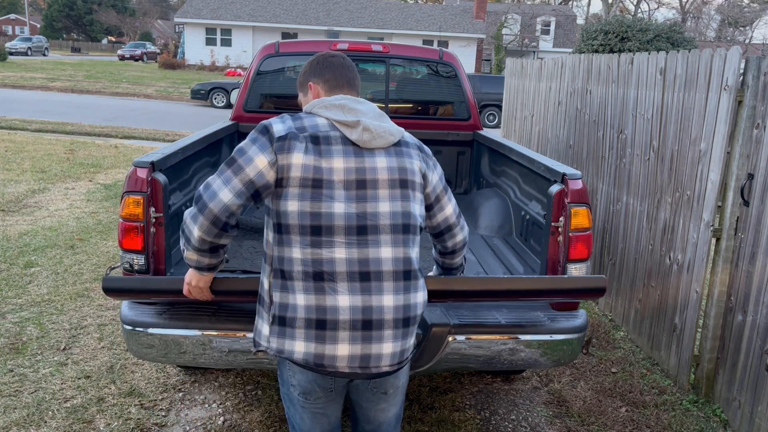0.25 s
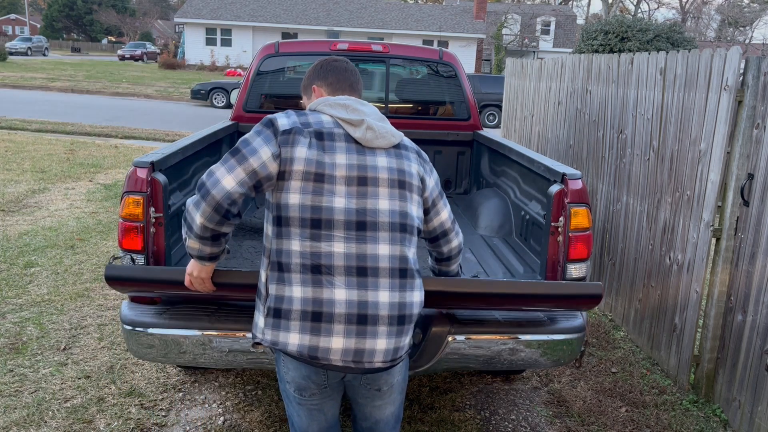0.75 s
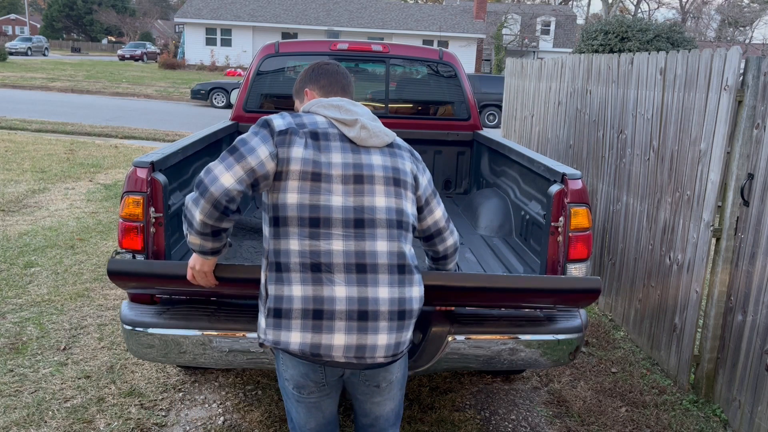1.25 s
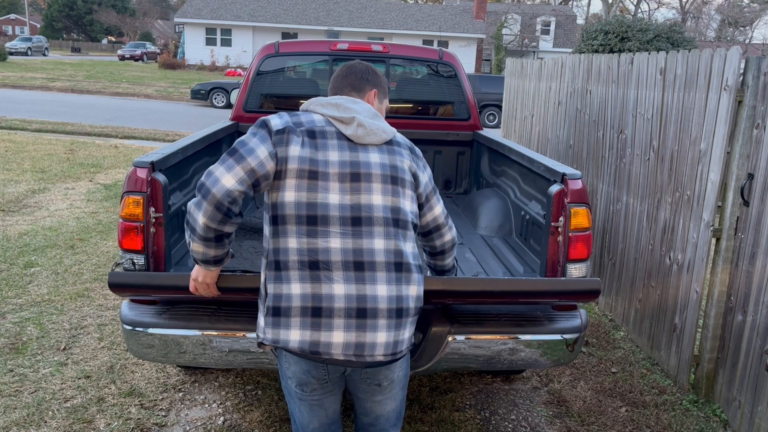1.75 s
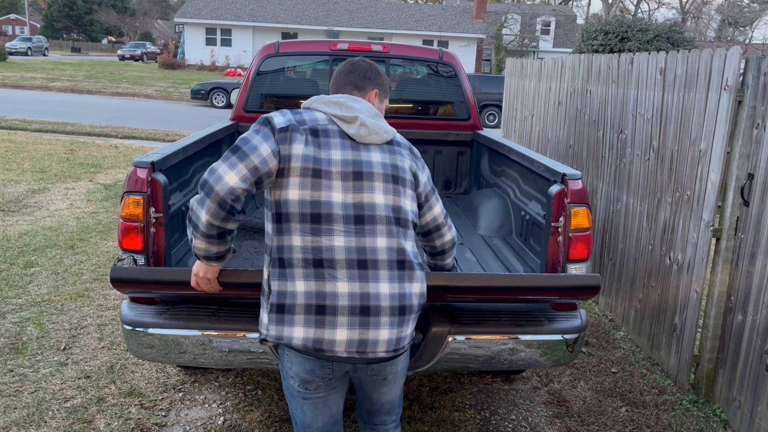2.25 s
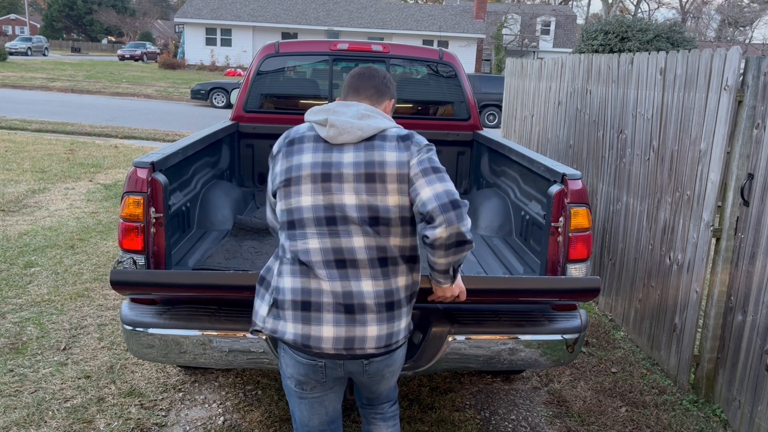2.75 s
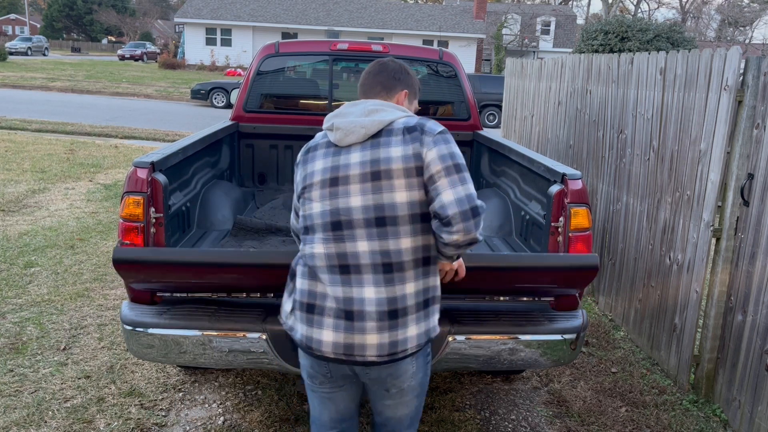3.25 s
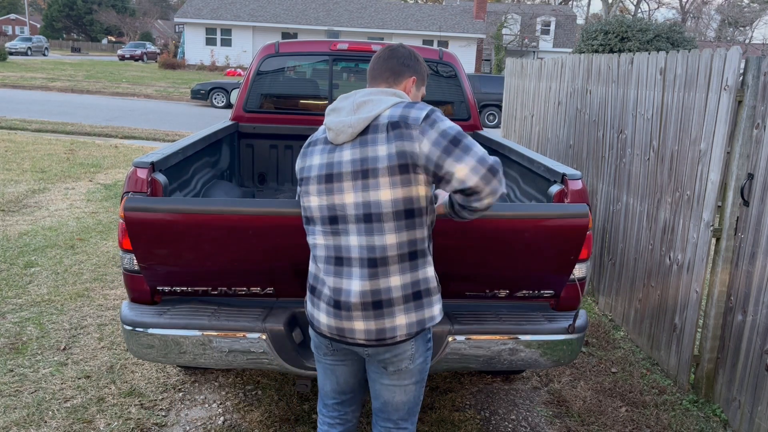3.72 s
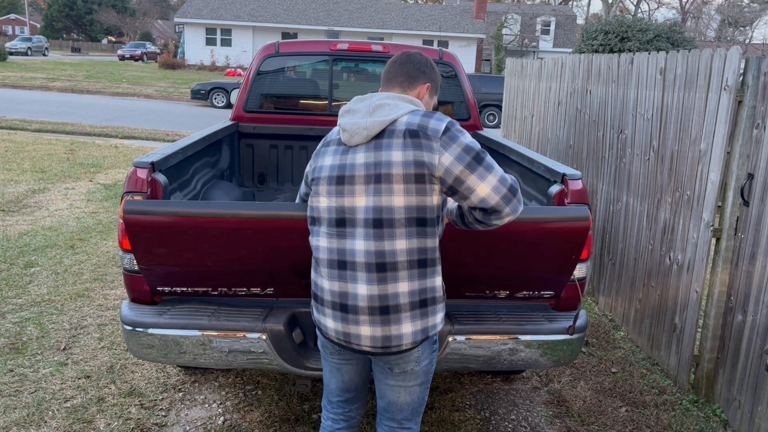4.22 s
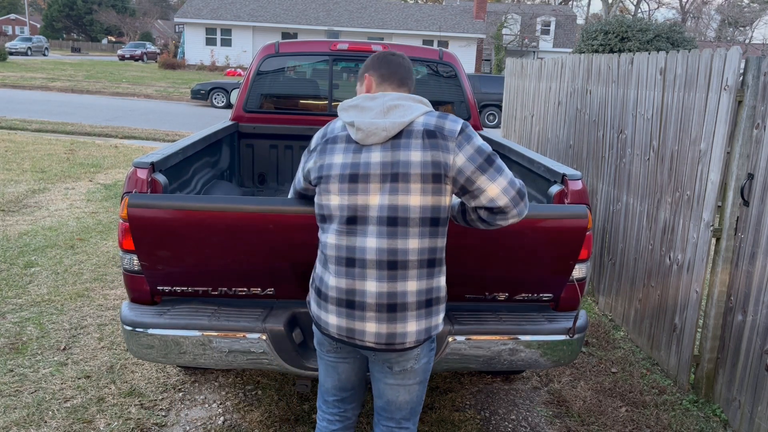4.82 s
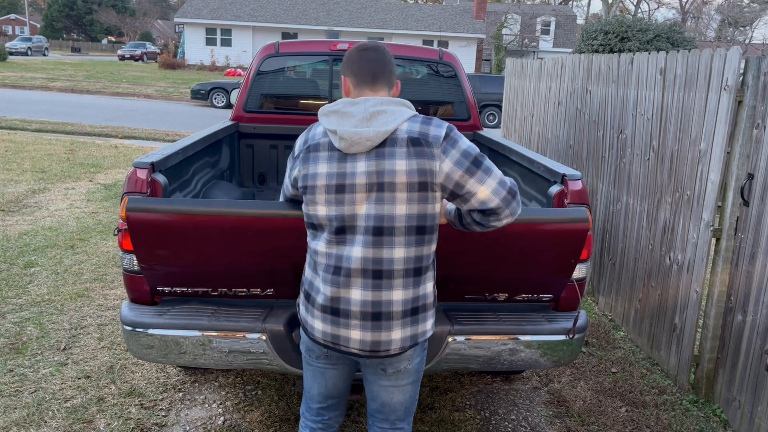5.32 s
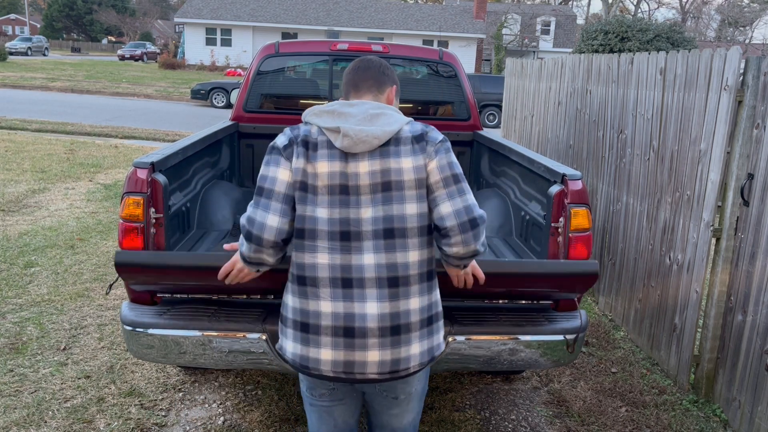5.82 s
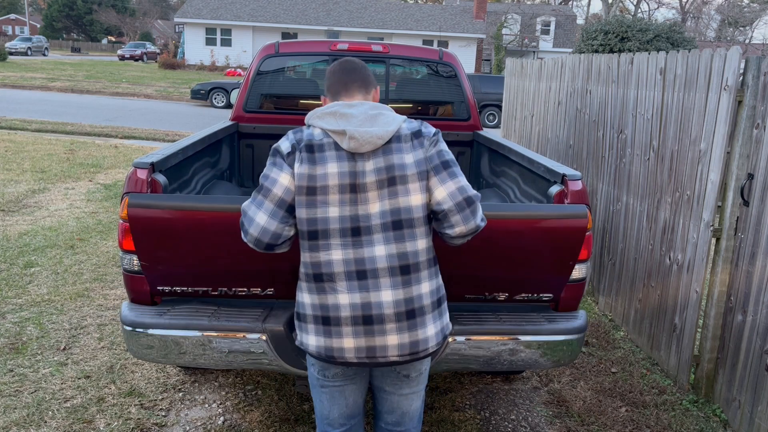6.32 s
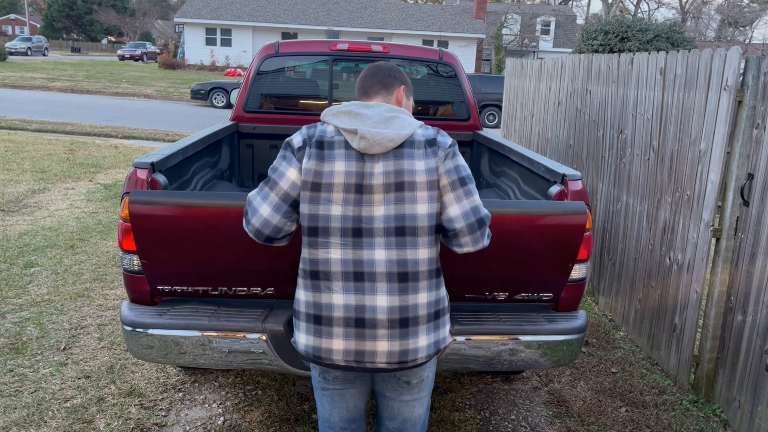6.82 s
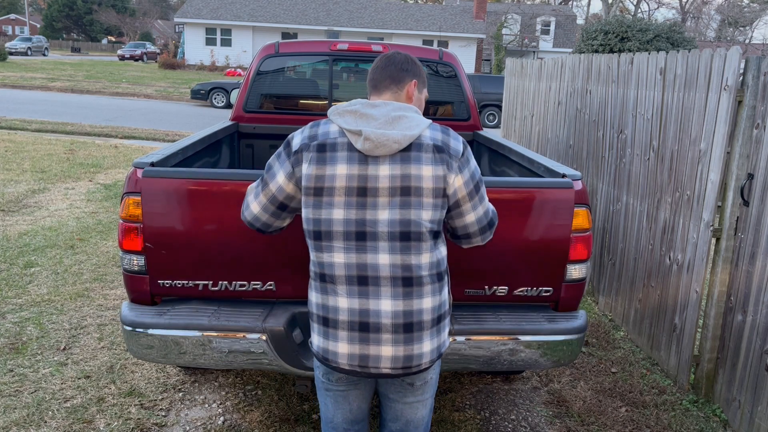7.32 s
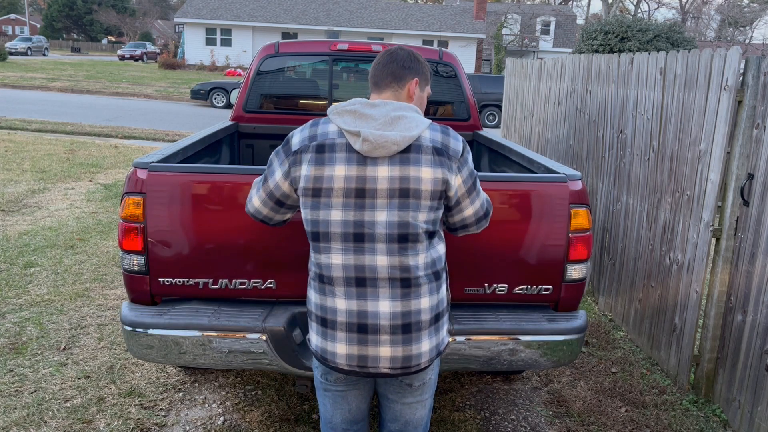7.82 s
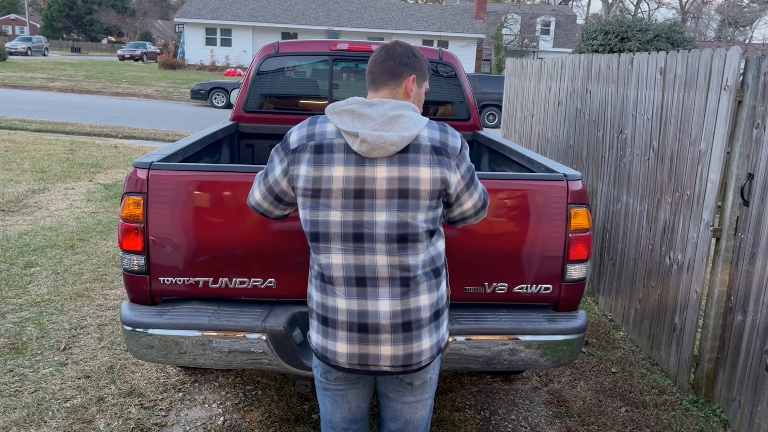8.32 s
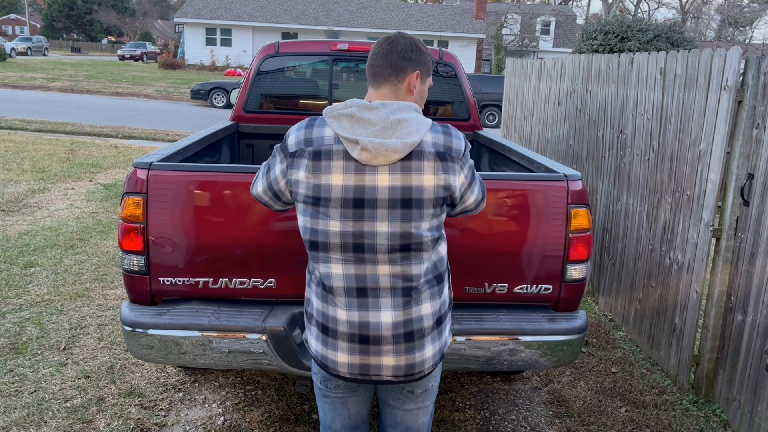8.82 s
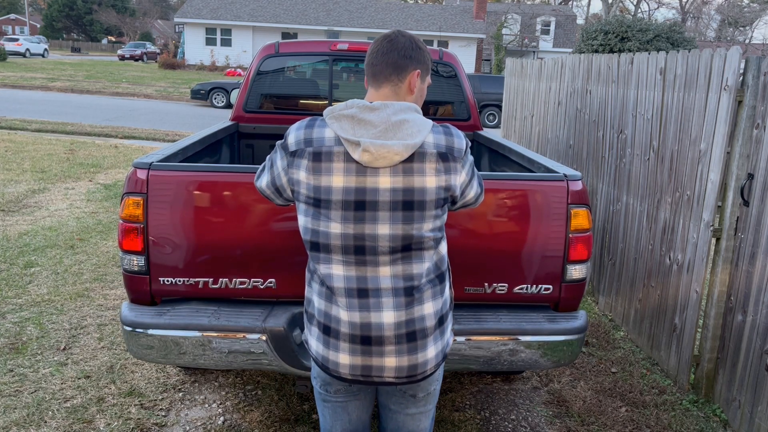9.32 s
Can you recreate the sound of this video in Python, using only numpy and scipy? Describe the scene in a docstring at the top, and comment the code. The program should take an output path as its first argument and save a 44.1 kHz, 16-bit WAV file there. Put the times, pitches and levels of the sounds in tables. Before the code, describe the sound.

Dull thuds and sharp steel clinks near a truck bed, a passing car, then hinge squeaks, a scrape, one heavy clanging slam and several small rattles.

```python
"""In a yard, a pickup's tailgate is worked onto its hinge pins: dull knocks, steel clinks, a rustling jacket.
It swings up on squeaking hinges, grinds against the latch, slams shut and rattles as it is tugged.
Contacts are short noise bursts shaped by colour and fading; steel adds ringing sine waves.
Squeaks are gliding tones with overtones. Filtered noise makes cloth, rubbing and distant traffic.
A car passes on the street at the start, with a humming exhaust note; a fainter one passes later.
"""
import sys
import numpy as np
from scipy import signal
from scipy.fft import rfft, irfft, next_fast_len
from scipy.io import wavfile
from scipy.ndimage import map_coordinates

SR = 44100
rng = np.random.default_rng(int(sys.argv[2]) if len(sys.argv) > 2 else 0)


def put_to_file(sound):
    """Save the sound as 16-bit audio at rate SR, in the file named by the first command-line argument."""
    columns = np.atleast_2d(sound).T  # one column per channel
    safe = np.clip(columns, -1, 1)
    whole_steps = np.round(safe * 32767)
    wavfile.write(sys.argv[1], SR, whole_steps.astype(np.int16))


N = 421596  # length of the scene in samples
TOP_HZ = 15870  # nothing is kept above this pitch

# Street and air. Colours are lists of (frequency [Hz], level [dB]).
# distant traffic
AIR_COLOUR = [(20, -7), (40, 3), (65, 3.5), (130, -7.5), (200, -6), (310, -7.5), (500, -12.5),
              (1000, -17.5), (1600, -29), (2500, -34.5), (4000, -39.5), (8000, -46), (16000, -47.5)]
# rolling tyres
TYRE_COLOUR = [(180, -19), (300, 4), (416, 0), (778, 3), (2540, -22), (4740, -47), (5790, -47), (9000, -55),
               (11700, -86), (19800, -120)]
# exhaust rumble
EXHAUST_COLOUR = [(40, -50.5), (85, -4), (115, 2), (150, -2), (195, -1), (250, -13), (400, -26), (900, -98)]
# passing cars, levels before the fence dulls the near one:
# (nearest at [s], time to cover their own distance from the yard [s], tyre level [dB], exhaust level [dB])
CARS = [(.76, .33, -49, -41), (3.3, 1.3, -63, -53)]
# tones in the near car's exhaust note: (multiple of the note [ratio], level [dB])
NOTE_TONES = [(1, 0), (1.6, -5)]
# the tailpipe points back, and is heard over a longer stretch than the tyres
EXHAUST_LAG_S, EXHAUST_SPREAD = .15, 1.8
# the near car goes behind the fence
SCREEN_S, SCREEN_FADE_S, SCREEN_DB = 1.4, .12, -9
# exhaust note: pitch abreast, share that it falls on either side, level over the rumble
NOTE_HZ, NOTE_DROP, NOTE_DB = 120, .14, -2

# how fast the yard's echo dies: (frequency [Hz], time to fall 60 dB [s])
YARD_FADE = [(100, 0.82), (600, 0.35), (3000, 0.27), (9000, 0.18)]

# rustling cloth: (frequency [Hz], level [dB])
CLOTH_COLOUR = [(300, -43), (1200, 21), (2000, 9.5), (3000, 3.5), (4500, 2.5), (7000, -3), (10000, -12),
                (16000, -28)]
# arm movements that rustle the jacket, over its resting level: (time [s], length [s], level [dB])
REACHES = [(0, .65, -66), (2.4, .45, -66), (3.25, .3, -64), (3.85, 1.5, -68), (5.38, .065, -55),
           (5.55, .15, -55.5), (6.6, .5, -69), (8.36, 1.05, -68)]
REACH_RISE_S, REACH_FALL_S, CLOTH_REST_DB = .05, .04, -78

# dry rubbing in the hinge cups: (frequency [Hz], level [dB])
RUB_COLOUR = [(200, -11), (500, 1), (1000, 1.5), (1600, 1), (2200, -11), (3000, -16.5), (6000, -31),
              (16000, -46)]
# the open gate rubs as it is lifted and lowered: (time [s], length [s], relative level [dB])
SWINGS = [(3.03, .14, -59), (3.19, .11, -50.5), (3.37, .13, -55), (3.87, .1, -60), (4.42, .13, -60),
          (4.62, .11, -54), (5.1, .09, -52.5), (5.53, .04, -44.5), (5.61, .035, -42), (5.8, .2, -55),
          (5.98, .3, -50.5), (6.9, .38, -61)]
SWING_RISE_S, SWING_FALL_S = .03, .014

# the gate bumps on its hinges and in its latches:
# (time [s], length [s], thud pitch [Hz], thud level [dB], clank level [dB], click level [dB])
KNOCKS = [(.043, .014, 215, -36, -42.5, -69), (1.481, .026, 185, -17.5, -49, -51),
          (1.532, .0078, 115, -30.5, -70, -58), (1.626, .012, 132, -26, -64, -68),
          (1.658, .0093, 252, -54, -39.5, -43), (1.847, .015, 146, -36, -58, -70),
          (2.184, .025, 122, -20.5, -55, -57.5), (2.228, .016, 148, -13, -30, -30.5),
          (2.849, .039, 150, -42.5, -73, -71), (3.003, .019, 262, -44.5, -50, -69),
          (3.594, .0043, 230, -50, -37.5, -55), (3.827, .01, 163, -38.5, -70, -59),
          (4.49, .036, 181, -38.5, -48, -55.5), (4.744, .028, 124, -16.5, -32, -52),
          (4.784, .011, 140, -27, -56, -79), (5.033, .025, 106, -25.5, -52, -68),
          (5.192, .029, 235, -24, -21.5, -35), (5.615, .03, 190, -44, -52, -62),
          (5.704, .019, 200, -31, -36, -38.5), (5.771, .024, 200, -45, -39.5, -44.5),
          (7.173, .039, 250, -57, -44.5, -52), (8.113, .007, 250, -32, -22, -29)]
# a thud's colour around its pitch: (multiple of the pitch [ratio], level [dB])
THUD_COLOUR = [(.15, -19.5), (.4, -5.5), (.8, 1), (1.25, -2), (2.1, -8), (3.6, -21.5), (7, -32.5),
               (18, -71)]
# clanking skin: (frequency [Hz], level [dB])
CLANK_COLOUR = [(100, -30.5), (300, -5), (430, 4.5), (600, 2.5), (830, 3), (1050, 0), (1350, -.5),
                (1900, -24.5), (4000, -25), (9000, -62)]
# clicking pin: (frequency [Hz], level [dB])
CLICK_COLOUR = [(600, -16.5), (1500, 5.5), (2400, 4), (3600, -7), (6000, -16.5), (10000, -30), (16000, -44)]
# how fast a blow dies in the hinge: (frequency [Hz], time to fall 60 dB [s])
HINGE_FADE = [(100, 0.11), (600, 0.057), (3000, 0.033), (12000, .02)]

# steel pins, cups and cable ends touch:
# (time [s], length [s], touch level [dB], contact pitch [Hz], ring level over the touch [dB])
CLINKS = [(.036, .0031, -57, 8900, -32), (.131, .02, -67.5, 2740, 6.5), (.599, .015, -59.5, 4530, -15),
          (1.382, .022, -42.5, 2450, -1), (1.659, .0067, -42.5, 3000, -25), (1.797, .028, -58.5, 2130, -3),
          (2.23, .015, -47, 5200, -21), (2.563, .036, -63, 4240, -5), (3.213, .052, -57, 2590, -25),
          (3.275, .033, -52.5, 3100, -10), (3.382, .0096, -56, 2780, -18), (3.455, .0061, -57, 3160, -7),
          (3.49, .0017, -42.5, 3900, -6), (3.724, .013, -50.5, 2130, -7), (3.957, .07, -68.5, 3940, -4),
          (4.097, .0016, -50, 2900, -10), (4.523, .023, -50, 3870, -7), (4.518, .016, -57.5, 15000, -25),
          (4.683, .033, -45.5, 3140, -15), (4.695, .046, -51, 11800, -9), (5.703, .02, -42.5, 6550, -23),
          (5.771, .0021, -43, 5100, -15), (5.91, .016, -53, 3360, -19), (6.025, .025, -60, 3150, 0),
          (6.696, .005, -60, 1800, -6), (8.113, .005, -33, 6500, -15), (8.35, .0037, -56, 4000, -11)]
# ring of the small hardware: (frequency [Hz], level [dB], time to fall 60 dB [s])
STEEL_RING = [(1870, -9, 0.067), (2010, -2, 0.038), (2310, 0, 0.065), (2660, -4, 0.021), (2860, -10, 0.042),
              (3413, -7, 0.036), (4700, -9, .05)]
# loose hardware ticks faintly while the gate is handled; the ring level is over the touch
TICK_FROM_S, TICK_TO_S, TICKS_PER_S = 3.3, 4.5, 4
TICK_S, TICK_DB, TICK_HZ, TICK_RING_DB = .008, -68, 3800, -4

# hinge squeaks:
# (time [s], length [s], first pitch [Hz], last pitch [Hz], level before sagging [dB], pitch jitter [share])
SQUEAKS = [(.596, .02, 3910, 4880, -57.5, .04), (3.95, .09, 1700, 1880, -64, .07),
           (4.43, .1, 1750, 1850, -62, .07), (5.908, .014, 3040, 3300, -51.5, .06),
           (7.076, .035, 4050, 5100, -59.5, .045), (7.16, .05, 3900, 3150, -64, .06),
           (7.212, .045, 3080, 2930, -60, .035), (7.264, .125, 2480, 2300, -54.5, .026),
           (7.272, .1, 1010, 880, -56, .04), (7.662, .045, 2800, 2660, -59, .02),
           (7.692, .064, 2100, 1360, -42, .045)]
SQUEAK_RISE_S, SQUEAK_FALL_S, SQUEAK_SAG_DB = .012, .01, 4  # the sag builds over a squeak's length
GLIDE_BEND = .8  # under 1, the pitch moves fastest at the start
SQUEAK_WANDER, WANDER_PER_S = .012, 60  # the pitch strays by this share, this often

# the gate's edge grinds past the bed wall, then the latch rides up its striker:
# (time [s], length [s], rise [s], relative level [dB])
GRINDS = [(7.745, .12, .024, -25.7), (8.113, .09, .016, -19.5)]
# scraping steel: (frequency [Hz], level [dB])
GRIND_COLOUR = [(40, -31), (130, -8.5), (280, 0.5), (560, 0), (1300, -5), (2300, -5), (3400, -13.5),
                (4400, -12), (6500, -15), (9000, -23.5), (13000, -25.5), (16000, -30)]
# the gate's ring while it grinds: (frequency [Hz], time to fall 60 dB [s])
BODY_FADE = [(200, 0.56), (1500, 0.16), (5000, 0.089), (14000, 0.072)]
# ring of the latch and hinge hardware: (frequency [Hz], level [dB], time to fall 60 dB [s])
LATCH_RING = [(465, -1, .1), (785, 0, .1), (845, 0, .1), (1330, 0, .09), (1470, 0, .09), (1790, -1, .08),
              (2130, -3, .07), (4060, -4.5, .075), (4200, -6, .07), (6020, -10, .06), (10800, -11, .04)]
GRIND_FALL_S = .011

# the gate slams onto its stops: (time [s], length [s], relative level [dB], brightness [dB per octave])
SLAM = (8.204, .021, -9, -.6)
# the latch snaps in:
# (time after the slam [s], length [s], touch level [dB], pitch [Hz], ring level over the touch [dB])
SNAP = (.003, .012, -25, 10500, -29)
# the bed booms:
# (time after the slam [s], length [s], thud pitch [Hz], thud level [dB], clank level [dB], click level [dB])
BOOMS = [(.04, .015, 89, -26, -21, -45), (.07, .028, 70, -24.5, -37, -58)]
# crash of the gate on its stops: (frequency [Hz], level [dB])
SHUT_COLOUR = [(25, -21.5), (70, -27), (140, -7.5), (270, -8), (420, -1), (750, -2.5), (1400, -2.5),
               (1900, -11), (2700, -16.5), (4300, -17), (8000, -23.5), (13000, -31), (16000, -36.5)]
# how fast a blow dies in the shut gate: (frequency [Hz], time to fall 60 dB [s])
GATE_FADE = [(80, .7), (500, .29), (1200, .21), (3000, .145), (7000, .095), (14000, .085)]
# ring of the gate's sheet steel: (frequency [Hz], level [dB], time to fall 60 dB [s])
PANEL_RING = [(46.7, -15.5, 0.53), (69.5, -15.5, 0.89), (79.8, -17, 0.65), (109.7, -14, 0.19),
              (176.4, -22, 0.77), (402, -9.5, 0.18), (410.3, -6.5, .3), (530, -12, 0.23), (600, -12, 0.2),
              (706, -8, 0.19), (705, -4.5, 0.2), (728, -5, 0.24), (797, -11, 0.4), (977, -22, 0.17),
              (1083, -9.5, .22), (1176, -19, 0.16), (1336, -9, 0.22), (1295, -12.5, 0.18),
              (1432, -18.5, .2), (1470, -14, 0.22)]

# the shut gate is tugged: its latch ticks, then it meets its stops:
# (time [s], tick level [dB], slack [s], relative rattle level [dB])
TUGS = [(8.632, -36.5, .002, -37.5), (8.878, -45, .01, -45), (9.114, -42, .002, -38),
        (9.311, -38, .014, -44), (9.508, -37, .003, -37.5)]
# a tug's thud, each over the rattle setting: (thud level [dB], clank level [dB], click level [dB])
TUG_THUD_DB = (.5, -18, -36)
TUG_TICK_S, TUG_TICK_HZ, TUG_TICK_RING_DB = .006, 1520, -23
TUG_RATTLE_S, TUG_BRIGHT_DB = .013, -3.7  # the rattle's length and its tilt per octave
TUG_THUD_LAG_S, TUG_THUD_S, TUG_THUD_HZ = .01, .035, 235


def amp(db):
    """Turn decibels into a plain gain."""
    return 10 ** (np.asarray(db) / 20)


def unit(x):
    """Scale x to an average (rms) strength of 1."""
    return x / np.sqrt(np.mean(x ** 2) + 1e-20)


def lasting(x, length):
    """Scale x to rms 1 as if all its energy lay within a contact of this length."""
    return x / np.sqrt(np.sum(x ** 2) / (SR * length) + 1e-20)


def along(points, hz):
    """Read between (frequency, value) points on a log frequency axis."""
    point_hz, values = np.transpose(points)
    return np.interp(np.log(hz + 1), np.log(point_hz + 1), values)


def wobble(rate, n):
    """Draw a smooth random curve, with rate knots a second."""
    knots = rng.standard_normal(int(n * rate / SR) + 4)
    return map_coordinates(knots, [np.arange(n) * rate / SR])


def add(track, s, x):
    """Mix x into the track from second s on."""
    part = track[max(round(s * SR), 0):][:len(x)]
    part += x[:len(part)]


def coloured(x, points):
    """Filter x to the given spectrum, with no sound ahead of its cause."""
    m = 2 * next_fast_len(len(x) // 2 + 2048)
    gain = amp(along(points, np.fft.rfftfreq(m, 1 / SR)))
    # folding the cepstrum forward in time makes the filter minimum-phase
    cepstrum = irfft(np.log(gain), m)
    cepstrum[1:m // 2] *= 2
    cepstrum[m // 2 + 1:] = 0
    return irfft(rfft(x, m) * np.exp(rfft(cepstrum)), m)[:len(x)]


def dying(n, hold, fade):
    """Noise that holds its level, then dies at each frequency's own speed."""
    hz, t, bins = signal.stft(rng.standard_normal(n), SR, nperseg=128)
    gain = amp(-60 * np.maximum(t - hold, 0) / along(fade, hz)[:, None])
    return signal.istft(bins * gain, SR, nperseg=128)[1][:n]


def ring(modes, n):
    """Struck steel rings as fading sine waves, with slightly new strengths and signs each time."""
    t = np.arange(n) / SR
    out = np.zeros(n)
    for hz, db, t60 in modes:
        strength = rng.choice([-1, 1]) * amp(db + rng.normal(0, 1) - 60 * t / t60)
        out += strength * np.sin(2 * np.pi * hz * t)
    return out


def chatter(length, colour, fade, rough_db, n):
    """Loose parts meet in a rough burst of noise that builds within a few milliseconds."""
    rise = 1 - np.exp(-np.arange(n) / SR / min(length / 7, .002))
    force = rise * dying(n, length, fade) * amp(rough_db * wobble(607, n))
    return lasting(coloured(force, colour), length)


def stroke(t, length, rise, fall):
    """A gain that rises from t = 0, holds until length and then dies away."""
    return np.clip(t / rise, 0, 1) * np.exp(-np.maximum(t - length, 0) / fall)


def strokes(rows, rise, fall):
    """The joint gain of several movements, adding their powers."""
    t = np.arange(N) / SR
    return np.sqrt(sum((amp(db) * stroke(t - s, length, rise, fall)) ** 2 for s, length, db in rows))


def rush(colour, gain, flutter_db, rate):
    """Coloured noise that follows a gain and flutters around it."""
    noise = coloured(rng.standard_normal(N), colour)
    return gain * unit(noise * amp(flutter_db * wobble(rate, N)))


def distant_traffic(air_db=-54):
    """Many far engines and tyres blend into a steady, mostly low noise."""
    return amp(air_db) * unit(coloured(rng.standard_normal(N), AIR_COLOUR))


def exhaust_note(waver=.03):
    """The near car's engine hums at a wavering pitch that falls as it goes by."""
    t = np.arange(N) / SR
    s, span = CARS[0][:2]
    hz = NOTE_HZ * (1 - NOTE_DROP * (t - s) / np.hypot(span, t - s))
    note = np.zeros(N)
    for multiple, db in NOTE_TONES:
        cycles = np.cumsum(multiple * hz * (1 + waver * wobble(25, N))) / SR
        note += amp(db) * np.sin(2 * np.pi * cycles)
    return unit(note)


def passing_cars():
    """Tyres and exhausts fade with distance; the fence screens the near car after it passes."""
    t = np.arange(N) / SR
    screen = amp(SCREEN_DB * (1 + np.tanh((t - SCREEN_S) / SCREEN_FADE_S)) / 2)
    near_road, far_road = [amp(db) / np.hypot(1, (t - s) / span) for s, span, db, _ in CARS]
    near_pipe, far_pipe = [amp(db) / np.hypot(1, (t - s - EXHAUST_LAG_S) / (span * EXHAUST_SPREAD))
                           for s, span, _, db in CARS]
    engine = rush(EXHAUST_COLOUR, np.hypot(screen * near_pipe, far_pipe), flutter_db=0.5, rate=12)
    tyres = rush(TYRE_COLOUR, np.hypot(screen * near_road, far_road), flutter_db=2.0, rate=10)
    return engine + tyres + amp(NOTE_DB) * screen * near_pipe * exhaust_note()


def yard(x):
    """The truck bed, fence and houses answer faintly, a moment late."""
    tail = dying(SR, 0, YARD_FADE)
    late_tail = np.pad(tail / np.linalg.norm(tail), (SR // 80, 0))
    return signal.fftconvolve(x, late_tail)[:N]


def jacket():
    """Cloth rustles as the arms work: fluttering noise over a faint resting level."""
    gain = amp(CLOTH_REST_DB) + strokes(REACHES, REACH_RISE_S, REACH_FALL_S)
    return rush(CLOTH_COLOUR, gain, flutter_db=2.0, rate=230)


def swing(level_db=-2, ring_db=-9):
    """The hinge cups rub dryly as the gate turns, and its hardware rings along."""
    rub = rush(RUB_COLOUR, strokes(SWINGS, SWING_RISE_S, SWING_FALL_S), flutter_db=2.5, rate=230)
    hardware = signal.fftconvolve(np.diff(rub, prepend=0), ring(LATCH_RING, SR // 4))[:N]
    return amp(level_db) * (rub + amp(ring_db) * np.std(rub) * unit(hardware))


def clinks(rows):
    """Harder steel contacts centre higher; the hardware rings briefly after them."""
    out, n = np.zeros(N), SR // 5
    for s, length, db, hz, ring_db in rows:
        colour = [(hz / 6, -20), (hz * 0.2, -8), (hz, 0), (hz * 1.65, -12), (hz * 4, -30), (hz * 9, -46)]
        touch = chatter(length, colour, [(1000, 0.027), (10000, 0.026)], rough_db=2, n=n)
        steel = lasting(signal.fftconvolve(touch, ring(STEEL_RING, n))[:n], length)
        add(out, s, amp(db) * (touch + amp(ring_db) * steel))
    return out


def ticks(scatter_db=2.5, pitch_scatter=.2):
    """Loose hardware clinks faintly at chance moments, each with its own strength and pitch."""
    count = round(TICKS_PER_S * (TICK_TO_S - TICK_FROM_S))
    times = rng.uniform(TICK_FROM_S, TICK_TO_S, count)
    rows = []
    for s, (a, b) in zip(times, rng.standard_normal((count, 2))):
        db, hz = TICK_DB + scatter_db * a, TICK_HZ * np.exp(pitch_scatter * b)
        rows.append((s, TICK_S, db, hz, TICK_RING_DB))
    return clinks(rows)


def knocks(rows):
    """Each bump thuds in the hollow gate, clanks in its skin and clicks at the pin."""
    out = np.zeros(N)
    for s, length, hz, *levels in rows:
        thud = [(hz * multiple, db) for multiple, db in THUD_COLOUR]
        for db, colour in zip(levels, (thud, CLANK_COLOUR, CLICK_COLOUR)):
            add(out, s, amp(db) * chatter(length, colour, HINGE_FADE, rough_db=1.5, n=SR // 5))
    return out


def squeaks(overtone_db=-11, pressure=0.51, fence_db=-6):
    """Dry steel sticks and slips at a gliding pitch; pressing harder brings out the overtones."""
    out = np.zeros(N)
    for s, length, first_hz, last_hz, start_db, jitter in SQUEAKS:
        t = np.arange(0, length + 2 * SQUEAK_FALL_S, 1 / SR)
        done = np.minimum(t / length, 1)
        hz = first_hz + (last_hz - first_hz) * done ** GLIDE_BEND
        db = start_db - SQUEAK_SAG_DB * done
        stray = jitter * wobble(2500, len(t)) + SQUEAK_WANDER * wobble(WANDER_PER_S, len(t))
        phase = 2 * np.pi * np.cumsum(hz * (1 + stray)) / SR
        slope_db = overtone_db + pressure * (db + 52.5)  # overtone level per octave; louder is brighter
        tone = sum(amp(slope_db * np.log2(k)) * np.sin(k * phase) * (k * hz < TOP_HZ) for k in range(1, 8))
        grip = unit(amp(4.5 * wobble(300, len(t))))
        squeal = amp(db) * stroke(t, length, SQUEAK_RISE_S, SQUEAK_FALL_S) * grip * unit(tone)
        add(out, s, squeal)
        add(out, s + .017, amp(fence_db) * squeal)  # the fence's echo
    return out


def grinds(ring_db=-3, body_db=1, level_db=-5.5):
    """Dense slips of steel on steel set the latch and the gate's many close modes ringing."""
    slips = np.zeros(N)
    t = np.arange(SR // 4) / SR
    for s, length, rise, db in GRINDS:
        grip = amp(1.8 * wobble(500, len(t)))
        rough = unit(grip * rng.standard_normal(len(t)))
        add(slips, s, amp(db) * stroke(t, length, rise, GRIND_FALL_S) * rough)
    scrape = unit(coloured(slips, GRIND_COLOUR))
    body = unit(signal.fftconvolve(scrape, dying(SR // 4, 0, BODY_FADE))[:N])
    latch = unit(signal.fftconvolve(slips, ring(LATCH_RING, SR // 4))[:N])
    return amp(level_db) * np.std(slips) * (scrape + amp(body_db) * body + amp(ring_db) * latch)


def gate_hits(rows, crash_db=1.5, panel_db=-1):
    """The gate hits its stops with a crash and its sheet-steel panel rings."""
    out = np.zeros(N)
    spread = 1 - np.exp(-np.arange(SR) / SR / .011)  # the blow takes a moment to spread through the sheet
    for s, length, db, bright_db in rows:
        crash = chatter(length, SHUT_COLOUR, GATE_FADE, rough_db=1.5, n=SR)
        panel = spread * ring(PANEL_RING, SR)
        tilt = [(hz, bright_db * np.log2(hz / 700)) for hz in (200, 16000)]
        add(out, s, amp(db) * coloured(amp(crash_db) * crash + amp(panel_db) * panel, tilt))
    return out


def tugs():
    """Each tug ticks the latch, takes up the slack, then rattles and thuds the gate."""
    tick = clinks([(s, TUG_TICK_S, db, TUG_TICK_HZ, TUG_TICK_RING_DB) for s, db, _, _ in TUGS])
    stops = [(s + slack, db) for s, _, slack, db in TUGS]
    rattle = gate_hits([(s, TUG_RATTLE_S, db, TUG_BRIGHT_DB) for s, db in stops])
    thud = knocks([(s + TUG_THUD_LAG_S, TUG_THUD_S, TUG_THUD_HZ, *(db + np.array(TUG_THUD_DB)))
                   for s, db in stops])
    return tick + rattle + thud


def slam():
    """The gate hits home, the latch snaps in and the bed booms."""
    s = SLAM[0]
    snap = clinks([(s + SNAP[0], *SNAP[1:])])
    booms = knocks([(s + lag, *boom) for lag, *boom in BOOMS])
    return gate_hits([SLAM]) + snap + booms


def scene(hinge_wet_db=-27, shut_wet_db=-20):
    """The gate close by, its echo in the yard and the street behind."""
    background = distant_traffic() + passing_cars() + jacket()
    fitting = swing() + clinks(CLINKS) + ticks() + knocks(KNOCKS)
    closing = squeaks() + grinds() + tugs() + slam()
    echo = yard(amp(hinge_wet_db) * fitting + amp(shut_wet_db) * closing)
    return (background + fitting + closing + echo)[None]


def record(dry):
    """Peaks round off at full scale and nothing is kept above the band limit."""
    held = dry / (1 + np.abs(dry) ** 8) ** (1 / 8)
    m = next_fast_len(N + SR // 4)
    kept = np.fft.rfftfreq(m, 1 / SR) < TOP_HZ
    return irfft(rfft(held, m) * kept, m)[..., :N]


dry = scene()
out = record(dry)
put_to_file(out)
```